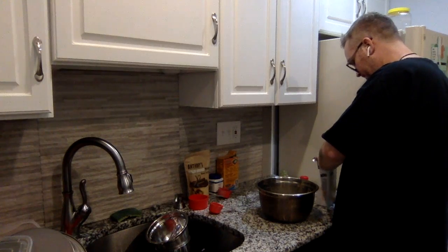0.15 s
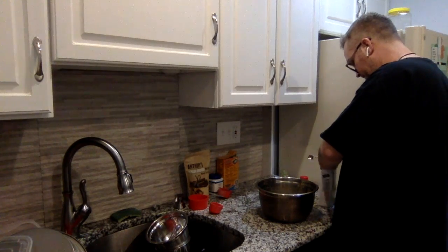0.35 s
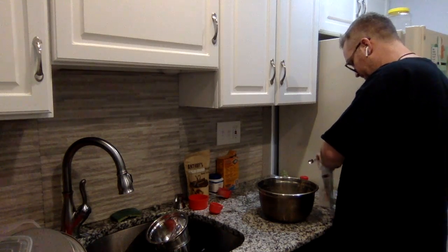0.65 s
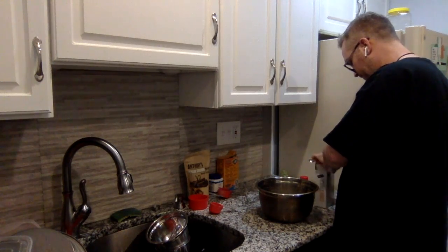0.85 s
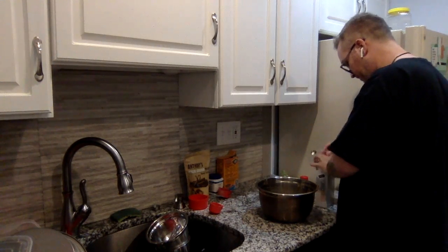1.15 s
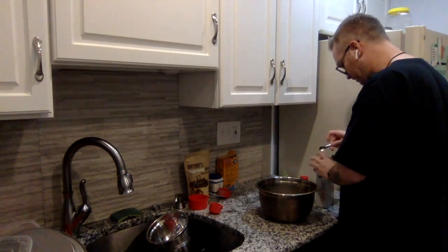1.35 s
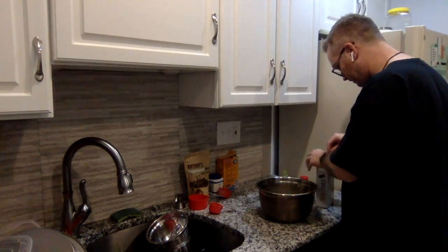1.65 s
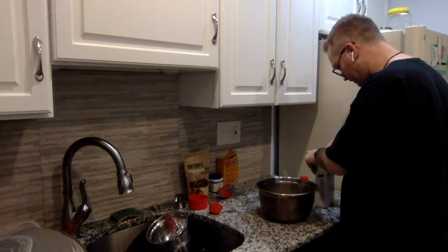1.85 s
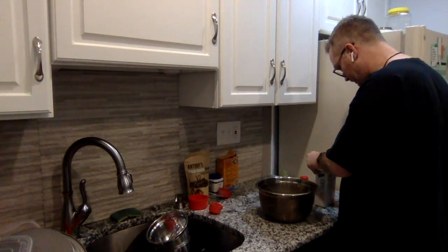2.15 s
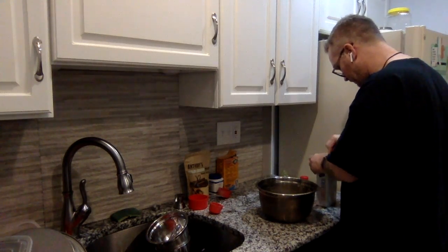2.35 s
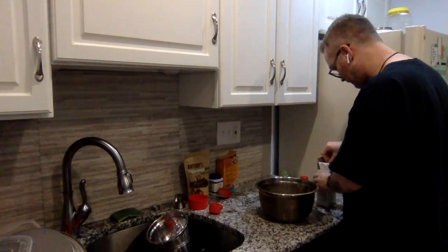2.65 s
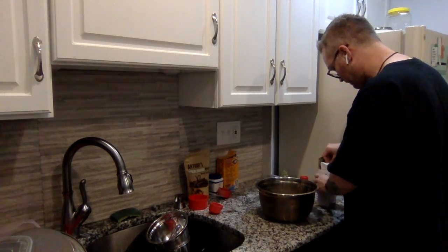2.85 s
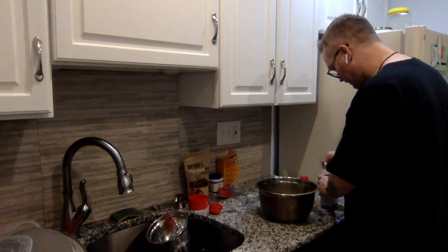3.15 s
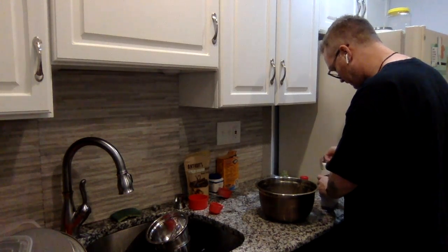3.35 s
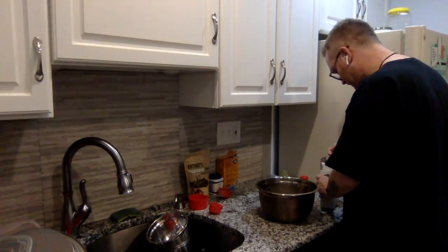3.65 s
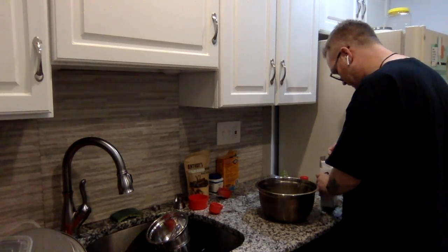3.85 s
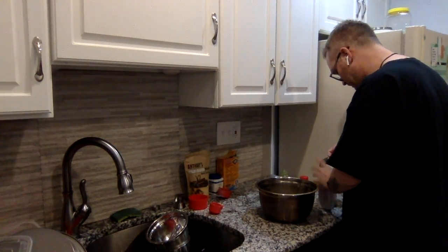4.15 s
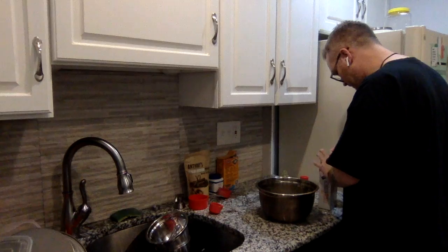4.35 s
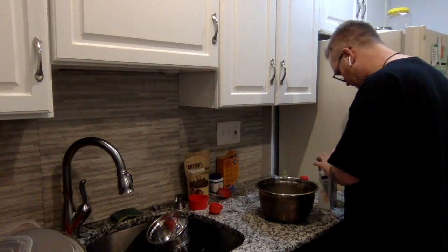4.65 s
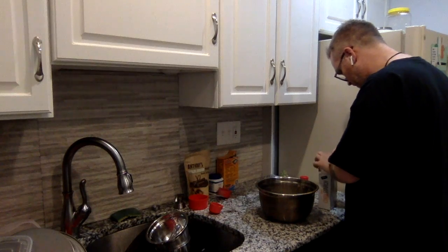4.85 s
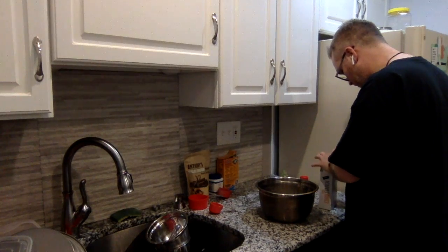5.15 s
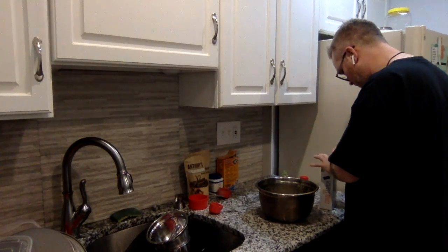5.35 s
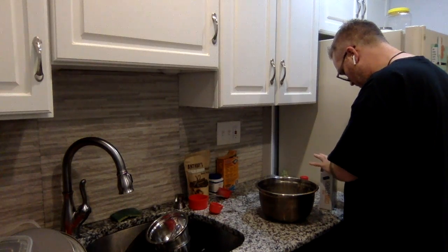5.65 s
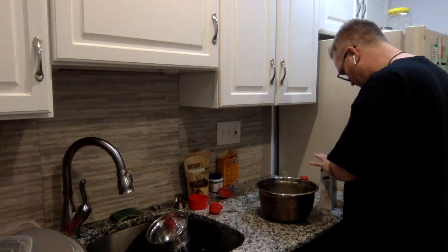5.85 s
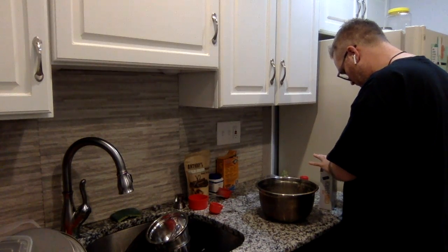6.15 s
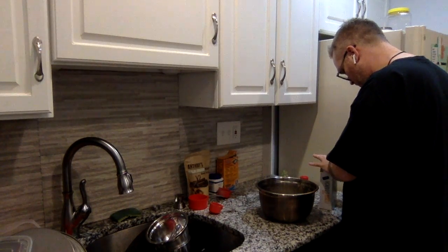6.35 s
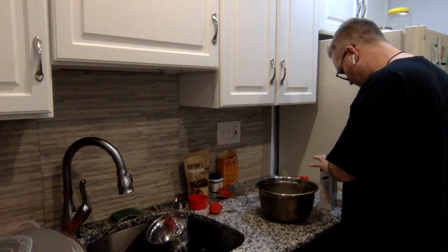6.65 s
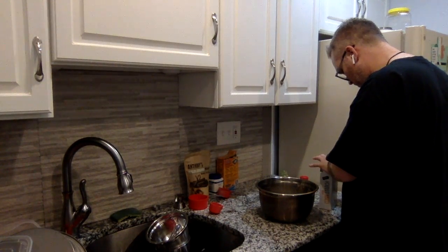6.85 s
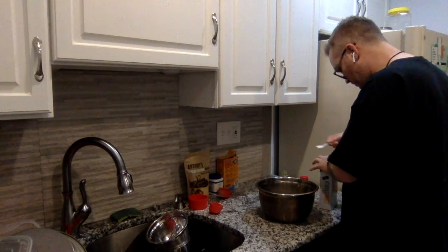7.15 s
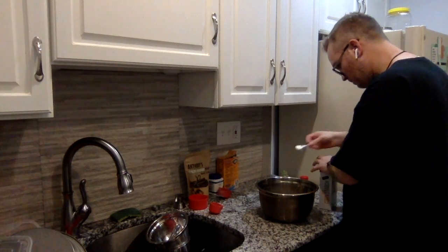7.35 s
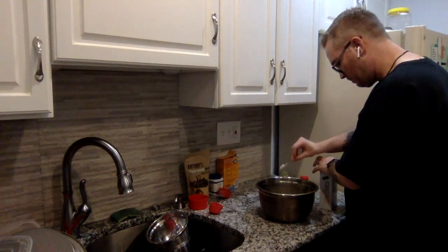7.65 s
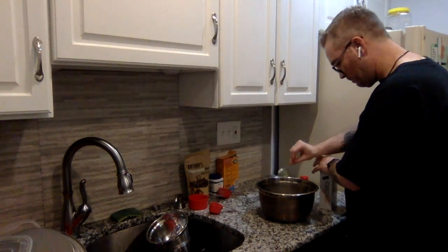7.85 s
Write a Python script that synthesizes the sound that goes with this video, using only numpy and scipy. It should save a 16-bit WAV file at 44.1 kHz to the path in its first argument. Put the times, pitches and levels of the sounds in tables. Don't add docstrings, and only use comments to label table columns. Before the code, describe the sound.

Stiff paper crackles brightly and close to dry, its hollow bag giving a papery midrange body. Busy, irregular flurries come first, with brief lulls, spoon ticks, scrapes and low muffled bumps on the counter. A shorter flurry arrives near five seconds, then isolated snaps and a last faint rustle. A low fridge hum wavers and sinks underneath. Modest laptop microphone across a small kitchen, short reflections cut off abruptly.

```python
import sys
import numpy as np
from scipy import signal
from scipy.fft import rfft, irfft
from scipy.io import wavfile
from scipy.ndimage import uniform_filter1d

SR = 44100
rng = np.random.default_rng(int(sys.argv[2]) if len(sys.argv) > 2 else 0)


def invert_db(x):
    u = np.asarray(x, float) / 20
    return 10 ** u


def to_wav(s):
    ch = np.atleast_2d(s).T
    pcm = np.round(np.clip(ch, -1, 1) * 32767)
    wavfile.write(sys.argv[1], SR, pcm.astype(np.int16))


N = 352800
TIME = np.arange(N) / SR


def crinkle():
    # (hardest moment [s], crinkle [dB], swell over 30 dB [s], fade over 30 dB [s],
    # hollow re crinkle [dB])
    rim = [(0.02, -35.5, 0.49, 0.09, -3), (0.436, -51, 0.21, 0.036, -5.5), (0.518, -40, 0.037, 0.089, 1),
           (0.714, -34, 0.28, 0.14, 3), (0.97, -36, 0.081, 0.19, 0), (1.05, -36.5, 0.068, 0.1, -8.5),
           (1.19, -42.5, 0.19, 0.021, -20), (1.91, -37.5, 0.12, 0.26, -2), (2.26, -41, 0.021, 0.31, 2),
           (2.62, -66.5, 0.31, 0.2, -19), (2.99, -51.5, .12, 0.35, 0.5), (3.26, -50, 0.024, 0.35, -8),
           (3.362, -39.5, 0.008, 0.12, -4), (3.6, -68, .15, 0.11, 3), (3.826, -57, 0.021, 0.4, -6.5),
           (4.7, -66.5, 0.25, 0.15, 7), (4.92, -39, .018, 0.091, -18), (4.944, -42, 0.065, 0.097, 1),
           (0.885, -48, 0.023, 0.26, 3.5), (5.8, -66, .015, 0.085, 9)]
    dig = [(0.06, -43, .05, .3, -5), (0.48, -34.5, 0.0056, 0.099, -1.5), (1.118, -43.5, 0.023, .16, 15.5),
           (1.3, -72, .2, .2, 3), (1.71, -46, 0.013, 0.29, 2), (1.83, -46.5, 0.069, 0.23, -30),
           (2.01, -44, 0.14, 0.56, 0.5), (2.17, -45.5, 0.36, 0.19, 2.5), (2.912, -49, .012, 0.2, -3),
           (2.75, -41.5, 0.017, 0.13, -3.5), (3.09, -36.5, 0.27, 0.11, -1),
           (4.106, -53.5, 0.0072, 0.22, -9), (4.766, -38, 0.077, 0.059, -4), (4.864, -42, .012, 0.052, 0),
           (5.3, -68.5, 1, 0.34, 2.5), (6.746, -55, 0.082, 0.02, -10), (7.082, -50, 0.031, 0.053, -12)]
    press = [(1.22, -56, .03, .3, -6), (2.41, -42, 0.094, .125, -14), (3.215, -46, .012, .15, -12),
             (3.942, -50.5, .04, 0.047, -23.5), (5.02, -58, .025, 0.26, -3),
             (5.39, -47.5, 0.069, 0.051, -20), (6.02, -75.5, 0.63, 0.15, 1), (6.765, -56, 0.015, 0.11, -2),
             (6.8, -65, .05, 0.051, 8), (7.04, -65.5, 0.0099, 0.12, 2), (7.162, -72, .012, 0.13, 4.5)]
    flick = [
        (5.778, -43, 0.007, .07, -40),
        (4.146, -52, 0.081, 0.078, -16),
    ]
    # (table, upper hollow [dB], crisp top re crinkle [dB],
    # share of the hollow level that the upper hollow follows [0-1])
    kinds = [(rim, -5, -2.5, 0.05), (dig, -4, -5, 0.09), (press, -3, -16, 0.77), (flick, -25, -3, 0.05)]

    shared = 0.59 * fibres(700, 2.94) * invert_db(3.6 * walk(70))
    body = hollow(shared + 0.6 * fibres(3000, 3.24), shifting_db=3.5)
    deep = level(band(body, 260, 1400, order=4), 0)
    upper = level(band(body, 1410, 3000, order=4), 0)
    mid = level(patches(2600, 7600, count=14, shared=shared, patchy_db=4.0, sharpness=7.6, tilt=0.55), 0)
    top = level(patches(7600, 14600, count=11, shared=shared, patchy_db=3.5, sharpness=9.9, tilt=1.0), 0)

    out = np.zeros(N)
    for table, upper_db, top_db, follows in kinds:
        out += mid * np.sqrt(strokes(table, colour_db=0, hollow_share=0, lingers=1))
        out += deep * np.sqrt(strokes(table, colour_db=-2.5, hollow_share=1, lingers=0.94))
        out += upper * np.sqrt(strokes(table, colour_db=upper_db, hollow_share=follows, lingers=1.08))
        out += top * np.sqrt(strokes(table, colour_db=top_db, hollow_share=0, lingers=0.68))
    return out * invert_db(-4.5)


def strokes(table, colour_db, hollow_share, lingers):
    power = np.zeros(N)
    for s, db, swell, fade, hollow_db in table:
        near = slice(max(int((s - 1.2 * swell) * SR), 0), int((s + 3 * fade) * SR))
        late = TIME[near] - s
        fading = (np.abs(late) / (fade * lingers)) ** 1.137
        spans = np.where(late < 0, -late / swell, fading)
        power[near] += invert_db(db + colour_db + hollow_share * hollow_db - 30 * spans) ** 2
    return power


def fibres(rate, spread_db, size=N):
    size_db = spread_db * np.minimum(rng.exponential(size=size), 3.0)
    return (rng.random(size) < rate / SR) * rng.standard_normal(size) * invert_db(size_db)


def patches(lo_hz, hi_hz, count, shared, patchy_db, sharpness, tilt):
    pitches = lo_hz * (hi_hz / lo_hz) ** ((np.arange(count) + rng.random(count)) / count)
    gains = shifting(count=count, rate=55, depth_db=patchy_db)
    out = np.zeros(N)
    for hz, gain in zip(pitches, gains):
        out += ring(shared + fibres(300, 2.6), hz, sharpness) * gain / hz ** tilt
    return out


def hollow(x, shifting_db):
    # (frequency [Hz], width [Hz], level [dB])
    bag = [(765, 36, -6), (952, 31, -0.5), (1050, 50, -5), (1222, 74, -0.5), (1312, 28, -10.5),
           (1412, 50, -1.5), (1616, 47, -10), (1744, 90, 0), (2053, 110, -7), (2220, 11, -15),
           (2410, 60, -18)]
    gains = shifting(count=len(bag), rate=12, depth_db=shifting_db)
    modes = np.zeros(len(x))
    for k, (hz, width, db) in enumerate(bag):
        modes += (-1) ** k * invert_db(db) * gains[k] * resonate(x, hz, width)
    direct = invert_db(-10.0) * x
    return band(modes + direct, 710, 2700, order=4) + invert_db(-22.0) * band(x, 350, 650, order=2)


def snaps():
    table = creases()
    strain_s, size = 0.006, 2048
    out, knocks = np.zeros(N + size), np.zeros(N + size)
    t = TIME[:size] - strain_s
    after = np.maximum(t, 0)
    strain = invert_db(-11) * np.exp(np.minimum(t, 0) / 0.0031) * np.exp(-after / 0.011)
    release = (1 - np.exp(-after / 0.0004)) * np.exp(-after / 0.0009)
    for s, db, body_db, top_db, hz, patch_db in table:
        noise = rng.standard_normal(size)
        burst = noise * (strain + 0.95 * release)
        crack = noise * (0.7 * strain + 1.3 * release)
        neighbours_hz = 2600 * 2.925 ** ((np.arange(12) + rng.random(12)) / 12)
        neighbours = sum(ring(burst, f, 8.05) for f in neighbours_hz)
        spread = 0.92 * neighbours + invert_db(-7.5) * band(burst, 2900, 8000, order=4)
        sharpness = 5.0 + 0.35 * max(patch_db, 0)
        patch = invert_db(patch_db) * 2.57 * ring(burst, hz, sharpness)
        crisp = invert_db(top_db) * band(crack, 8400, 15600, order=3)
        i = int((s - strain_s) * SR)
        out[i:i + size] += invert_db(db + 1.0) * (spread + patch + crisp)
        knocks[i:i + size] += invert_db(db + body_db + 6.5) * burst
    return out[:N] + hollow(knocks[:N], shifting_db=8.0)


def creases():
    # (time [s], peak [dB], hollow body re peak [dB], patch [Hz])
    folds = [(0.089, -30, -19, 5400), (0.4792, -35.5, -1, 2220), (0.5224, -22, 2, 6200),
             (0.6926, -19, -16, 4900), (0.962, -20.5, 2, 4850), (1.1161, -32.5, 4, 4730),
             (1.1356, -27.5, -14, 7550), (1.182, -25.5, 5.5, 3130), (1.8266, -45, -12, 4690),
             (1.8718, -30, -19, 2200), (2.1125, -24, 2, 6880), (2.3856, -27, 6, 2270),
             (2.5516, -57, -41, 2410), (2.86, -43.5, -10, 3260), (2.9125, -36, 6, 2940),
             (3.3645, -23.5, -2.5, 4900), (3.9372, -41, -16, 4000), (4.0263, -62, 3, 5440),
             (4.106, -44, -23.5, 6620), (4.1215, -33.5, -5, 6260), (4.7208, -29.5, -13, 3650),
             (4.742, -32, -16, 2280), (5.022, -33, -2, 3160), (5.0762, -35, 0, 2460),
             (6.7171, -56, -5, 4990), (7.0687, -38.5, -8, 2750), (7.7075, -61.5, -2.5, 7130)]
    # (time [s], peak [dB], hollow body re peak [dB], patch [Hz], crisp top re peak [dB])
    cracks = [(0.172, -29, -2, 4520, -7.5), (0.424, -41, -9, 6300, -1), (0.8813, -37, 8, 3150, -5),
              (1.9221, -23, -1, 6100, 2), (2.0346, -23, 6, 4900, -2.5), (2.2587, -31, 9, 5900, 2),
              (2.7444, -30.5, -25, 6670, -3.5), (2.9976, -23.5, 3, 6580, 2.5),
              (3.257, -31.5, -13, 8200, 1.5), (3.2803, -35.5, 5, 7000, -1), (3.593, -47.5, -13, 2820, -6),
              (4.144, -32.5, -8, 8030, -4), (4.589, -62, -7.5, 7070, -6.5), (5.2778, -59, 14, 2860, -0.5),
              (5.7781, -31, -42, 4600, -7)]
    # (time [s], peak [dB], hollow body re peak [dB], crisp top re peak [dB])
    tears = [(0.5927, -31.5, -18.5, -8), (0.615, -25.5, -2.5, -6), (0.838, -46, -7, -11),
             (0.9094, -30.5, -22, -5), (1.0326, -32, -24, 0.5), (1.7074, -31, 0, -3.5),
             (2.6002, -48.5, -13, -7), (2.953, -39, 13, -9.5), (3.2133, -34, -2, -16),
             (3.829, -31.5, -16, -5), (4.5208, -64, -4, 12), (4.6947, -34.5, -26, -6),
             (4.848, -50, -22, -9), (4.9183, -29, -17.5, -12.5), (5.3595, -52, -21, -8.5),
             (5.901, -60.5, -1.5, -20.5), (6.7393, -50, -11, -14), (7.5168, -61.5, 3, -26.5)]
    # (time [s], peak [dB], hollow body re peak [dB], patch [Hz], patch re peak [dB])
    ticks = [(0.0178, -23.5, -15, 2580, -2), (0.1156, -36.5, -22, 5080, 12), (0.1527, -40, 6, 4300, 10),
             (0.244, -41, -17, 5200, 8.5), (0.279, -45, 13, 3170, 18), (0.3143, -44.5, -6, 2135, 17.5),
             (2.286, -29, -13, 2200, 1), (2.4054, -26, -3, 3390, 6.5), (2.7987, -37.5, -11, 5030, 1.5),
             (4.627, -70, -5, 7400, 10), (5.3856, -39, -24.5, 4250, 7), (6.437, -60, -18, 3850, 12),
             (6.527, -70, 3, 7070, 12), (6.76, -60, 1, 2900, 18), (7.042, -50, -19, 5570, 13.5),
             (7.162, -52, -4.5, 3400, 11)]
    # (time [s], peak [dB], hollow body re peak [dB],
    # patch [Hz], crisp top re peak [dB])
    hidden = [(0.7525, -30, -8, 7500, 4), (0.3636, -50, -15, 6500, 0), (0.5077, -33, -10, 6500, 0),
              (0.605, -32, -12, 7000, 0), (0.6504, -36, -10, 6000, 0), (1.9065, -28, -10, 6500, 0),
              (1.9811, -33, -12, 7500, 2), (2.1612, -36, -12, 5500, -2), (2.206, -40, -10, 5000, 0),
              (2.8785, -52, -15, 6700, -8), (4.756, -36, -12, 5000, -6), (1.0453, -29, -18, 3000, -2),
              (2.0515, -22.5, -25.5, 4460, -14.5), (2.5, -56, -12, 6600, -27), (3.0847, -32, 0, 2180, -7.5),
              (3.118, -36, -12, 6100, 5.5), (0.994, -23.5, -13, 5050, 1), (0.922, -32, -13.5, 6000, -4.5),
              (6.437, -51.5, -27, 4800, -24.5), (4.8621, -34.5, -13.5, 3130, -19),
              (6.8094, -62, 8, 4800, -26)]

    rows = [(s, db, body, -11, hz, -2) for s, db, body, hz in folds]
    rows += [(s, db, body, top, hz, -2) for s, db, body, hz, top in cracks]
    rows += [(s, db, body, top, 4700, -15.5) for s, db, body, top in tears]
    rows += [(s, db, body, -23, hz, patch) for s, db, body, hz, patch in ticks]
    rows += [(s, db, body, top, hz, -4.5) for s, db, body, hz, top in hidden]
    return rows


def panels():
    # (time [s], level [dB], panel [Hz], fade over 20 dB [s])
    hums = [(0.008, -42, 1700, .09), (0.017, -34, 2500, .03), (0.148, -43, 1850, .08),
            (0.171, -45, 6100, .03), (0.171, -47, 4200, .04), (0.31, -55, 4200, .05),
            (0.434, -54, 2800, .02), (0.485, -40, 1600, .06), (0.519, -40, 3700, .012),
            (1.82, -49, 1700, .12), (2.745, -48, 950, .05), (2.745, -45, 5100, .02),
            (2.902, -48, 2750, .04), (3.035, -45, 2200, .04), (3.078, -40, 950, .04),
            (3.211, -46, 2000, .04), (3.21, -55, 5600, .04), (3.255, -49, 2000, .04), (3.28, -54, 770, .04),
            (3.39, -50, 1000, .03), (3.44, -60, 1000, .25), (3.598, -60, 780, .03), (3.826, -56, 2300, .03),
            (3.95, -60, 1900, .06), (4.78, -48, 1100, .09), (4.865, -50, 1200, .05), (4.93, -47, 1200, .06),
            (5.06, -56, 1100, .1), (5.08, -49, 2400, .035), (5.085, -54, 3600, .05),
            (5.022, -52, 2000, .04), (4.524, -62, 12500, .03), (5.13, -68, 7300, .12),
            (5.4, -60, 1900, .05), (5.78, -57, 1250, .06), (2.497, -56, 6600, .02), (5.79, -54, 5200, .05),
            (6.431, -58, 4050, .02), (6.436, -55, 5200, .012), (6.436, -57, 2900, .012),
            (6.445, -57, 3800, .04), (6.668, -68, 4400, .025), (6.69, -68, 3600, .03),
            (6.735, -60, 5300, .07), (6.757, -49, 1700, .09), (6.76, -54, 1000, .08),
            (6.782, -57, 3100, .06), (6.81, -60, 5400, .025), (6.758, -54, 600, .06), (0.01, -46, 800, .12),
            (0.96, -42, 6000, .1), (1.72, -50, 4400, .2)]
    out, t = np.zeros(N + SR // 2), TIME[:SR // 2]
    for s, db, hz, fade in hums:
        tone = level(ring(fibres(4000, 1.6, size=len(t)), hz, 8.5), db)
        i = int(s * SR)
        out[i:i + len(t)] += tone * (1 - np.exp(-t / 0.003)) * invert_db(-20 * t / fade)
    return out[:N]


def rubs():
    # (time [s], length [s], panel [Hz], level [dB])
    slides = [(4.62, .085, 5200, -61), (4.6, .095, 7100, -62), (4.63, .06, 8400, -67),
              (4.64, .05, 11500, -70), (7.162, .035, 5600, -67), (2.61, .06, 10200, -68),
              (2.9, .09, 6700, -58), (3.87, .06, 6800, -63), (1.703, .07, 1250, -47),
              (4.665, .06, 1200, -59), (4.14, .11, 2000, -62)]
    out = np.zeros(N)
    for s, length, hz, db in slides:
        i, n = int(s * SR), int(length * SR)
        swell = np.sin(np.pi * np.arange(n) / n) ** 0.5
        out[i:i + n] += level(ring(fibres(4000, 1.6, size=n), hz, 13.0), db) * swell
    return out


def bumps():
    # (time [s], peak [dB], boom re peak [dB], slap re peak [dB])
    knocks = [
        (0.019, -41.5, -17.5, -16.5),
        (0.738, -44.5, -10.5, -21),
        (1.141, -44, -18, -23),
        (2.034, -47, -8.5, -20.5),
        (3.079, -57, -3.5, -25),
        (3.933, -46, -43, -33),
        (4.762, -62, -3, -26),
        (6.11, -58, -30, -42.5),
        (6.761, -48.5, -10, -18),
        (7.104, -50, -31, -30),
    ]
    size = 4096
    low, high, slap, t = np.zeros(N), np.zeros(N), np.zeros(N), TIME[:size]
    push = np.exp(-t / 0.025) * (1 - np.exp(-t / 0.0025))
    for s, db, boom_db, slap_db in knocks:
        thud = push * rng.standard_normal(size)
        i = int(s * SR)
        low[i:i + size] += invert_db(db + 24.5) * thud
        high[i:i + size] += invert_db(db + boom_db + 28.5) * thud
        slap[i:i + size] += invert_db(db + slap_db + 33.5) * thud
    return band(low, 110, 170, order=2) + band(high, 280, 570, order=2) + band(slap, 540, 2300, order=2)


def room(x):
    t60_s, room_db, gate_s = 0.31, -6, 0.038
    t = TIME[:SR // 4]
    noise = rng.standard_normal(len(t))
    dull = band(noise, 160, 8600, order=1)
    early_bright = invert_db(4) * (noise - dull) * np.exp(-t / 0.015)
    tail = (dull + early_bright) * invert_db(-60 * t / t60_s)
    tail *= (1 - np.exp(-t / 0.0021)) / (1 + np.exp((t - gate_s) / 0.0053))
    return x + invert_db(room_db) * signal.fftconvolve(x, tail / np.sqrt(np.sum(tail ** 2)))[:N]


def kitchen():
    # (time [s], hum [dB])
    background = [(0, -56.5), (0.6, -58.5), (1.25, -58.5), (1.45, -61), (1.68, -65), (1.9, -57.5),
                  (2.6, -58.5), (3.6, -59), (4.4, -59.5), (5.3, -58.5), (5.9, -61.5), (6.35, -65.5),
                  (6.7, -61), (7.0, -60), (7.5, -63), (7.75, -64), (8, -67.5)]
    # (frequency [Hz], density [dB per Hz])
    air = [(25, -47.5), (44, -27.5), (60, -25), (95, -21), (125, -7), (196, -20.5), (350, -22), (480, -27),
           (590, -39.5), (750, -29), (2550, -35.5), (2700, -39.5), (6000, -48), (13800, -59)]
    # (frequency [Hz], width [Hz], level [dB])
    tones = [(59.6, 3, -8.5), (120.2, 6, 2), (168.4, 25, -9.5), (356, 12, -16), (761, 30, -20),
             (1940, 40, -26), (2480, 120, -25)]

    hum_db = np.interp(TIME, *np.transpose(background))
    air_db = -81 + 1.2 * (hum_db - np.mean(hum_db))
    hum = np.zeros(N)
    for hz, width, db in tones:
        steady = 30 * np.sin(2 * np.pi * hz * TIME) / np.sqrt(SR / width)
        hum += level(resonate(rng.standard_normal(N) + steady, hz, width), db)

    air_hz, shape_db = np.transpose(air)
    f = np.maximum(np.arange(N // 2 + 1) * SR / N, 1)
    shape = invert_db(np.interp(np.log(f), np.log(air_hz), shape_db, left=-80))
    spectrum = rfft(rng.standard_normal(N)) * shape
    low = level(irfft(spectrum * (f < 600), N), -2.8) * invert_db(hum_db + walk(13))
    high = level(irfft(spectrum * (f >= 600) * (f < 13900), N), 10.3) * invert_db(air_db + walk(8.9))
    return level(hum, -4) * invert_db(hum_db + walk(8.9)) + low + high


def level(x, db):
    return x * invert_db(db) / np.sqrt(np.mean(x ** 2))


def band(x, lo_hz, hi_hz, order=3):
    sos = signal.butter(order, [lo_hz, min(hi_hz, 0.45 * SR)], "bandpass", fs=SR, output="sos")
    return signal.sosfilt(sos, x)


def resonate(x, hz, width_hz):
    return signal.lfilter(*signal.iirpeak(hz, hz / width_hz, fs=SR), x)


def ring(x, hz, sharpness):
    return resonate(resonate(x, hz, hz / sharpness), hz, hz / sharpness)


def walk(rate):
    k = int(SR / rate)
    held = np.repeat(rng.standard_normal(N // k + 1), k)
    return 1.3 * uniform_filter1d(uniform_filter1d(held, k), k)[:N]


def shifting(count, rate, depth_db):
    gains = invert_db(depth_db * np.array([walk(rate) for _ in range(count)]))
    return gains / np.sqrt(np.mean(gains ** 2, axis=0))


def scene():
    paper = crinkle() + snaps() + panels()
    return (room(paper) + rubs() + bumps() + kitchen())[None]


def roll_off(x):
    return signal.sosfilt(signal.butter(12, 16510, fs=SR, output="sos"), x)


def record(dry):
    cut = signal.sosfilt(signal.ellip(8, 0.2, 60, 15750, fs=SR, output="sos"), dry)
    return roll_off(cut)


dry = scene()
out = record(dry)
to_wav(out)
```